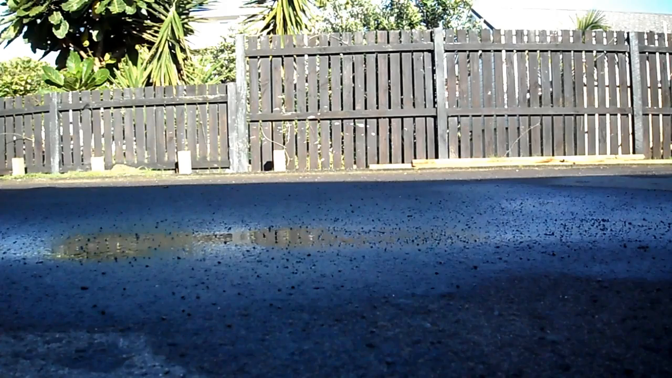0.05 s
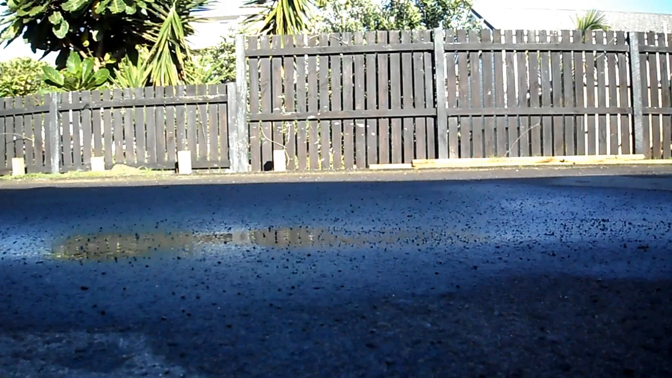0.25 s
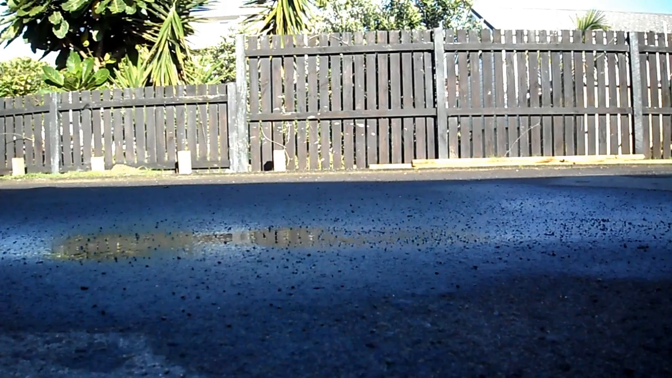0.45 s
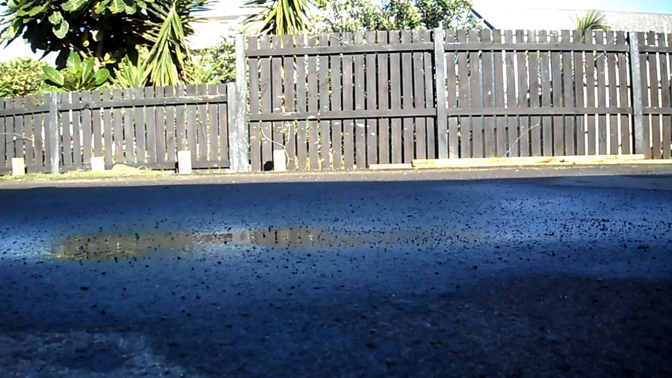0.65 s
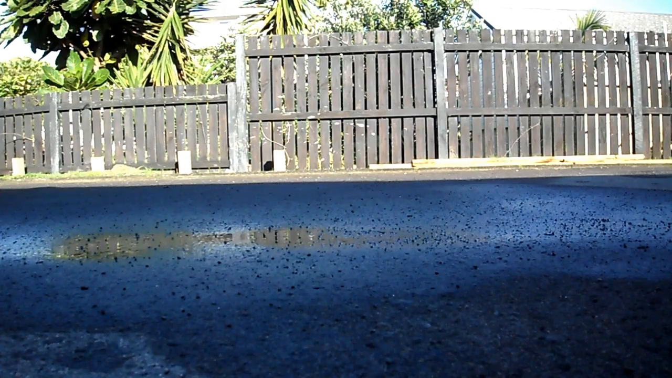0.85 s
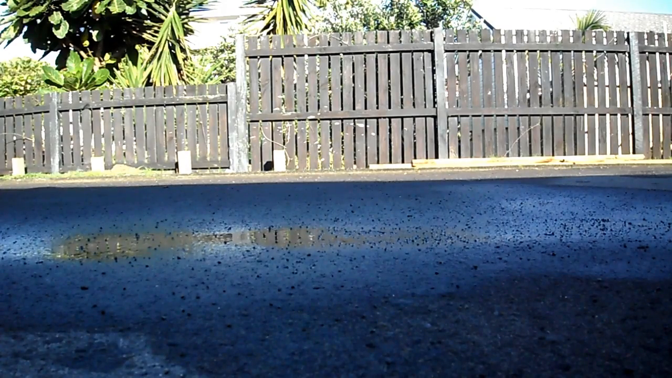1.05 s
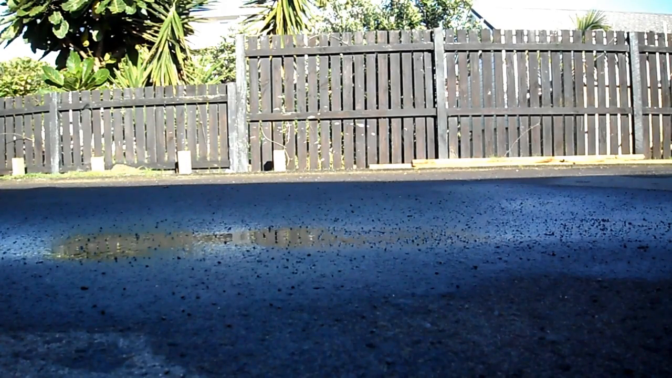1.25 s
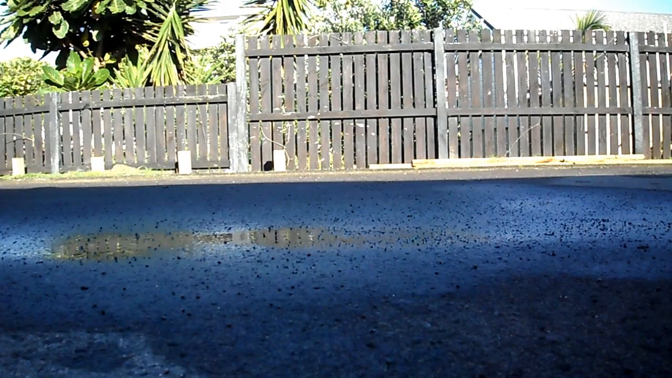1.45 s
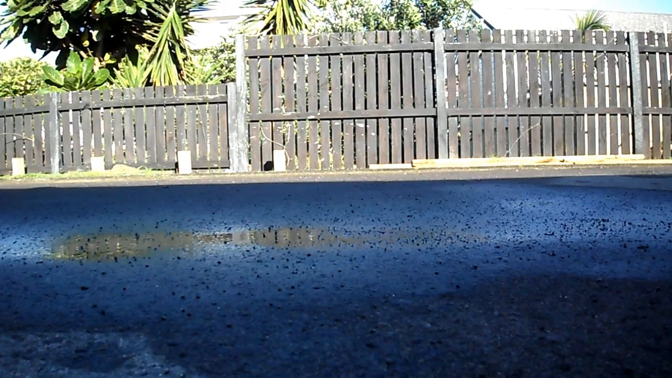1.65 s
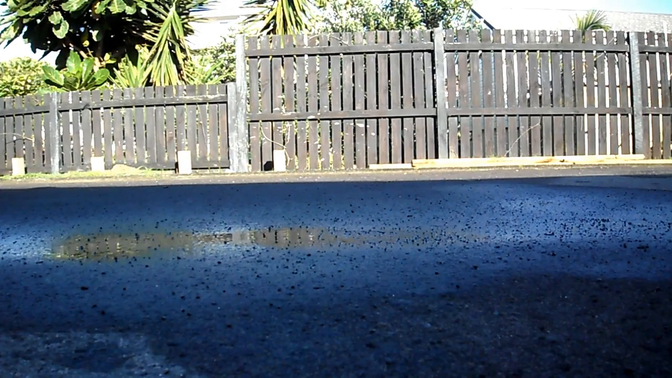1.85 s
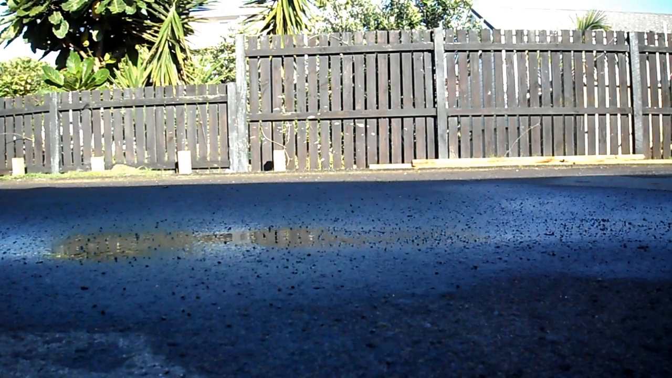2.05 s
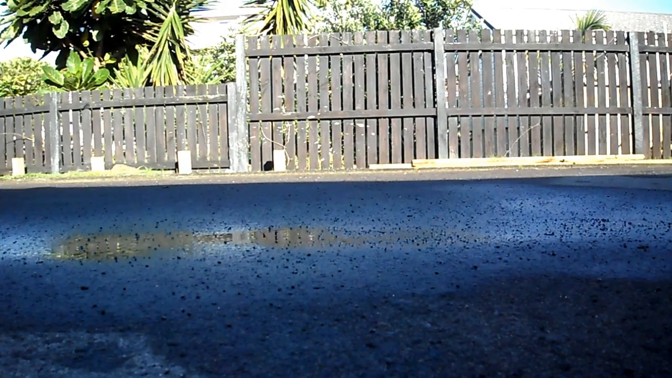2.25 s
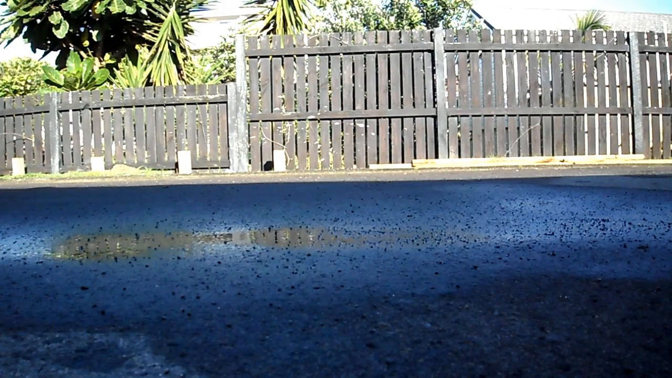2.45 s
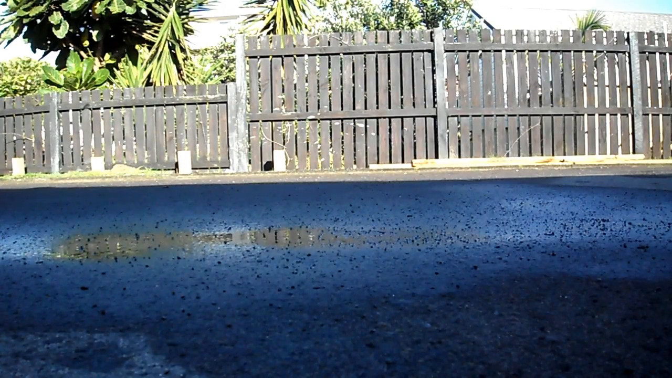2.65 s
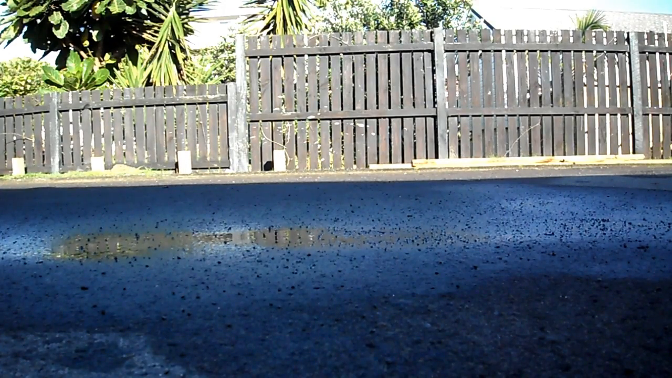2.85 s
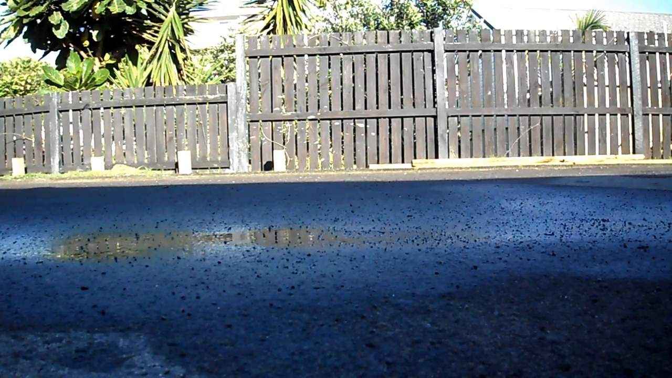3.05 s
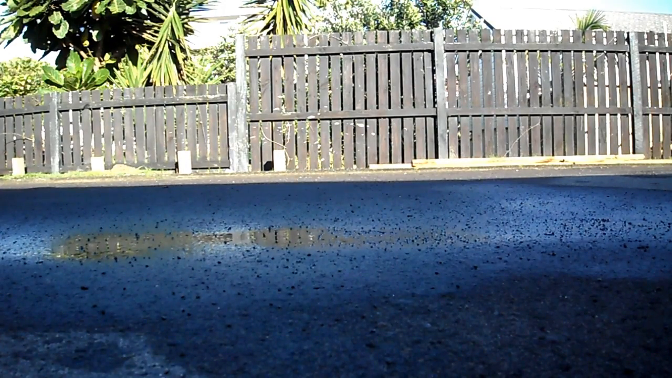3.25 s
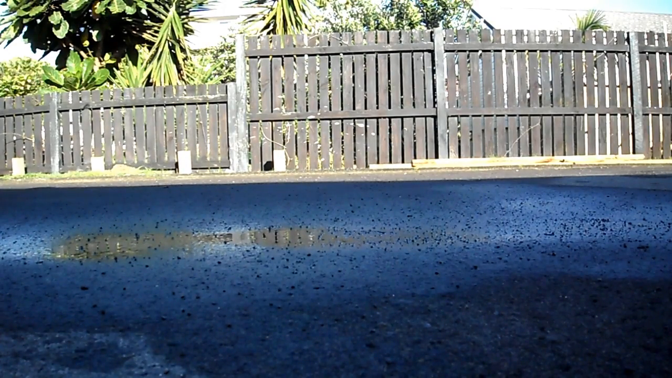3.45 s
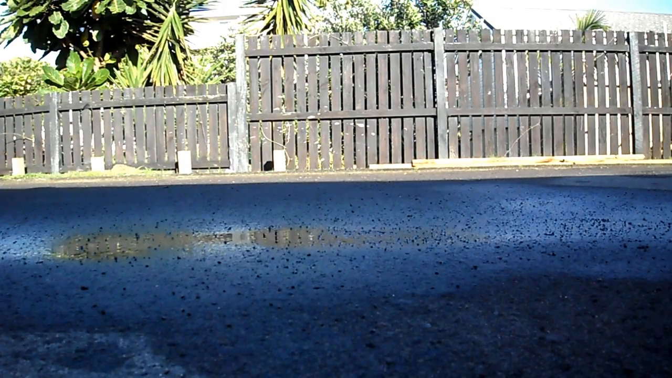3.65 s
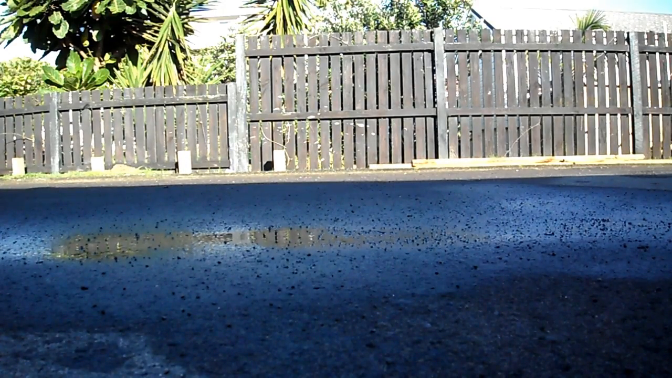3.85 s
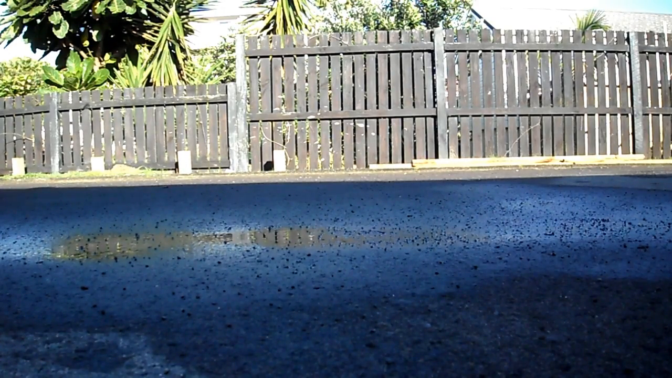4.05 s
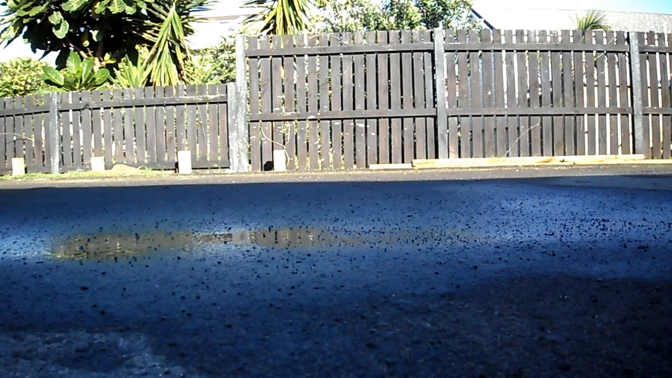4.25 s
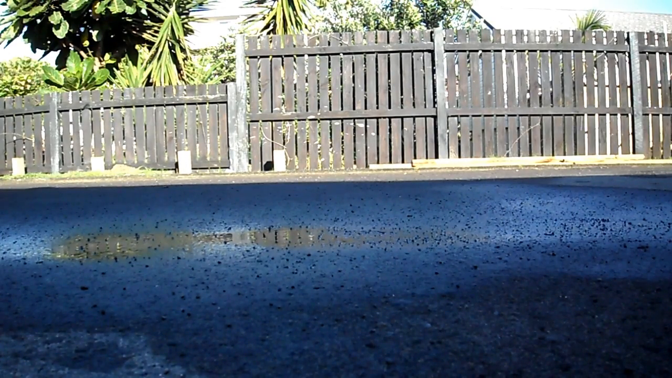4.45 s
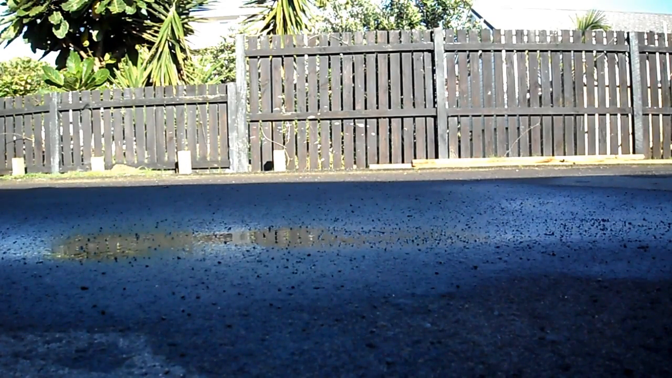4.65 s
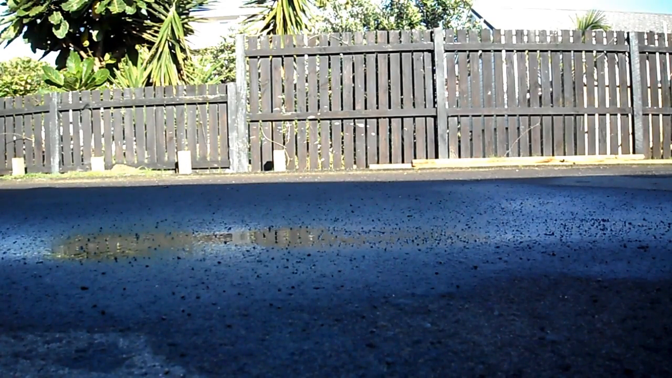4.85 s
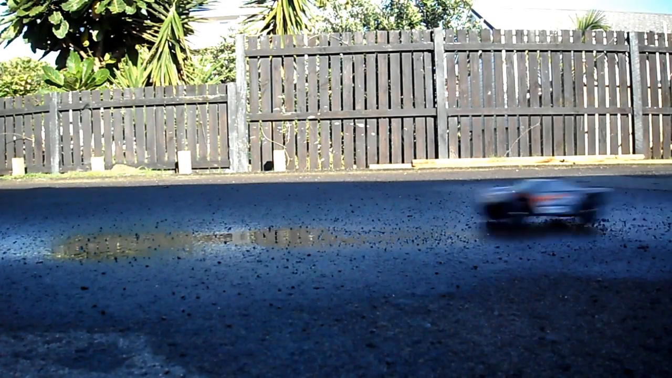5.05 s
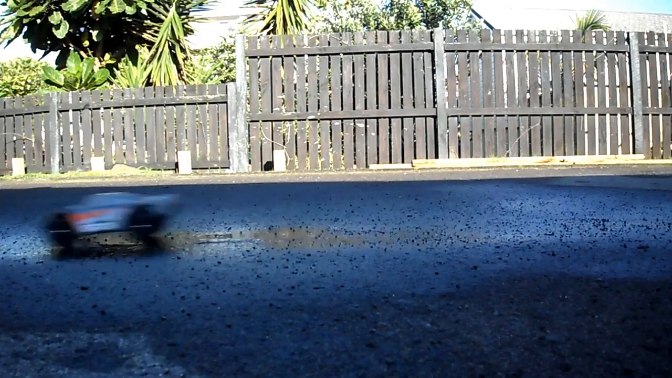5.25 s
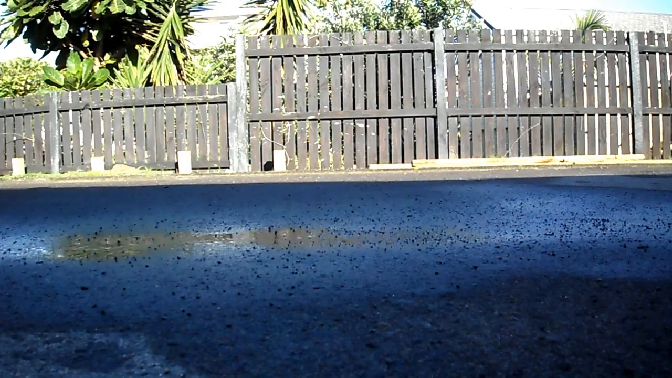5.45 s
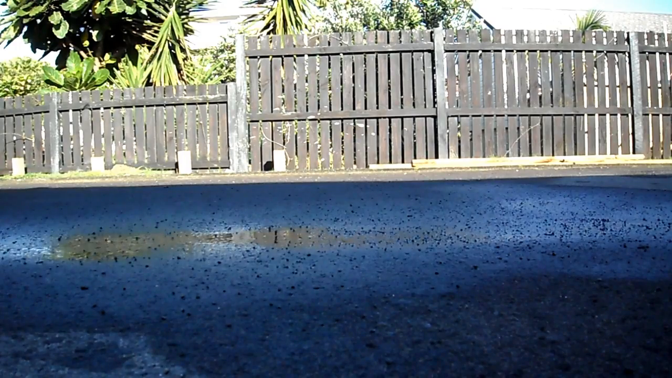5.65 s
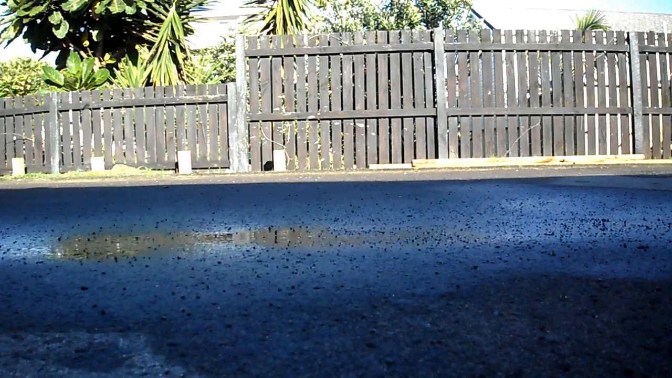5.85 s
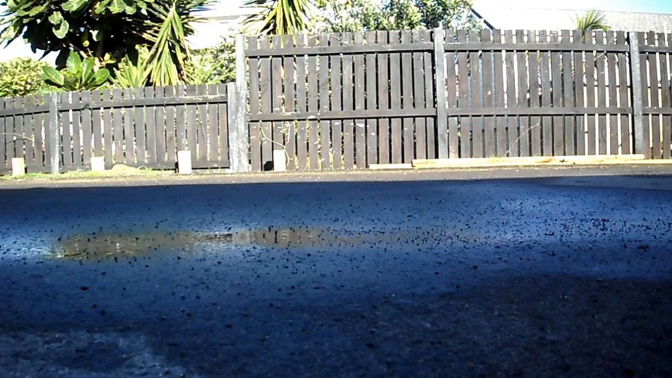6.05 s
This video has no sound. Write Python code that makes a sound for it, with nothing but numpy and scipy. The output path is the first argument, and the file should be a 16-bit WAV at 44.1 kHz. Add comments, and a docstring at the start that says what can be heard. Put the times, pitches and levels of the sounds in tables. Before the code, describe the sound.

A battery toy truck gives a short, distant burst of gear whine on a wet driveway, then coasts almost to silence while a small bird chirps faintly. It speeds up again, its whine rising and growing louder, tyres hissing and spraying through puddles. It passes close to the microphone with short, high tyre squeals and a plastic clatter, brakes, and whines away. A soft outdoor rumble lies underneath.

```python
"""A battery toy truck on a wet driveway: a burst of throttle, a long coast, then a fast run close by.
Its gears whine and tick, its motor sings and its plastic shell rattles. The tyres rumble, hiss,
throw spray and squeal as they slip; the truck jolts, brakes and pulls away.
In the lull a small bird chirps and a far one holds a thin note, over a quiet outdoor bed."""
import sys
import numpy as np
from scipy import signal
from scipy.fft import rfft, irfft, next_fast_len
from scipy.io import wavfile
from scipy.ndimage import uniform_filter1d

SR = 44100
rng = np.random.default_rng(int(sys.argv[2]) if len(sys.argv) > 2 else 0)


def generate_wav(signal):
    """Clip the signal to [-1, 1] and save it as 16-bit WAV at the path in sys.argv[1]."""
    frames = np.transpose(np.atleast_2d(signal))
    scaled = np.clip(frames, -1, 1) * 32767
    pcm = np.round(scaled).astype(np.int16)
    wavfile.write(sys.argv[1], SR, pcm)


N = 269010
TIME = np.arange(N) / SR

# Tone of the outdoor bed, road rumble, tyre hiss, spray and loose chatter.
# Each row: frequency in Hz, relative level in dB.
AIR_EQ = [(15, -29), (25, -8.5), (65, -5), (130, -3.5), (260, -1.5), (550, -5), (900, -11), (1350, -14.5),
          (1900, -22), (4200, -25.5), (5500, -31), (15500, -36)]
ROAD_EQ = [(30, -16), (70, -9), (130, -3.5), (300, -1.5), (600, -1), (1000, -5), (2000, -36), (8000, -62)]
TYRE_EQ = [(300, -19), (1000, -1), (1800, -3.5), (2600, 3.5), (3900, 5), (4800, -0.5), (7000, -3),
           (8000, -7), (10300, -12), (12000, -16.5), (16000, -23)]
SPRAY_EQ = [(200, -7.5), (500, 10), (1100, 18.5), (1900, 9.5), (2800, -1), (5000, 12), (9000, 11),
            (12000, 3.5), (16000, 1)]
RATTLE_EQ = [(100, -25), (300, -28.5), (600, -6), (900, -9), (1300, 9.5), (1850, -7), (2900, -5.5),
             (4500, -26), (8000, -38), (15000, -50)]
# Bird chirps. Each row: start and length in seconds, first and last pitch in Hz, level in dB.
CHIRPS = [(0.671, .019, 2800, 4840, -60.5), (2.283, .016, 2400, 4800, -62), (2.297, .015, 2600, 4730, -68),
          (2.366, .025, 2580, 3310, -61), (2.386, .024, 3100, 3820, -62.5), (2.748, .018, 2680, 5100, -64),
          (2.762, 0.02, 2700, 4970, -67.5), (2.85, 0.035, 3050, 4260, -63)]
# Puddles. Each row: middle and length in seconds, spray level in dB.
PUDDLES = [(0.522, 0.29, -79), (4.136, 0.25, -56.5), (4.684, 0.3, -68), (4.93, 0.14, -52.5),
           (5.278, 0.095, -49)]
# Squeals: a rising run of notes as the gears race while the wheels spin (4.83-5.16 s), then tyre squeaks. Each
# row: middle and length in seconds, pitch in Hz, level in dB.
SQUEALS = [(4.834, 0.024, 3180, -23.5), (4.859, .031, 3130, -24.5), (4.894, 0.033, 3530, -29.5),
           (4.93, 0.058, 3740, -28.5), (4.975, 0.053, 3870, -24.5), (5.014, .035, 3840, -21),
           (5.029, .021, 4030, -27), (5.043, .019, 3880, -18.5), (5.06, .017, 3824, -20),
           (5.076, 0.021, 3895, -17.5), (5.117, 0.039, 4040, -24.5), (5.154, 0.064, 4200, -25),
           (5.406, .018, 3070, -26.5), (5.436, 0.011, 2815, -28), (5.473, 0.016, 3490, -29.5),
           (6.036, 0.013, 3060, -32.5), (6.067, .011, 3180, -26.5), (6.095, 0.017, 3020, -32)]
# Chassis jolts on the wet ground. Each row: start in seconds, strength in dB, length in seconds.
JOLTS = [(5.273, -28.5, 0.018), (5.305, -24, .014), (5.334, -25.5, 0.0094), (5.368, -22.5, .011),
         (5.394, -26.5, 0.018), (5.466, -31.5, 0.0078)]
# Resonances of the shell and the gearbox. Each row: frequency and width in Hz, relative level in dB.
SHELL_MODES = [(1105, 400, -8), (1262, 200, 1), (1424, 124, 2), (1527, 90, -0.5), (2233, 110, -3.5),
               (3030, 460, -11), (3730, 330, -10)]
GEARBOX_MODES = [(2027, 93, 7), (2412, 240, 1.5), (2780, 160, -2), (3296, 184, 3.5), (3902, 90, 5.5),
                 (4260, 98, 0), (4950, 84, -14), (5900, 160, -7.5), (9360, 770, -19.5)]
# How well the shell gives off the whine. Each row: frequency in Hz, gain in dB.
SHELL_EQ = [(900, -7), (1100, -1.5), (1230, 6.5), (1380, 0.5), (1500, 8.5), (1800, -4.5), (2000, 1.5),
            (2250, -1.5), (2700, -5.5), (3300, 1.5), (3900, 10), (4700, -2.5), (7000, 1)]
# Spells of chopped drive current. Each row: start and end in seconds, level of the motor's note in dB.
MOTOR_NOTES = [(0, .58, -68), (2.873, 5.3, -58.5)]
# Play between the teeth frays the whine, most when braking and pulling away.
# Each row: time in seconds, jitter as a share of the pitch.
BACKLASH = [(0, .008), (4.7, .008), (5.2, .016), (5.5, .03), (6.1, .03)]
# Throttle moves: burst, coast, stop, run up, slow at a puddle, cruise, sprint, skid, brake, pull away.
# Each row: start in seconds, target tooth rate in Hz, lag in seconds, chassis load in dB,
# base levels of the mesh tone and of its octave in dB.
THROTTLE = [(0, 3700, 0.78, 2.5, -35, -38), (.56, 2500, 0.06, -4, -37, -46),
            (1.05, 1000, 1.7, -2.5, -54, -60), (2.2, 240, 0.19, -4, -54, -56),
            (2.87, 3720, 0.81, 1, -41, -39), (4.08, 2200, 0.52, -1, -34, -39),
            (4.27, 2500, 0.088, -3, -46, -45), (4.42, 2559, .03, 1, -46, -35.5),
            (4.785, 3350.5, .035, 1.5, -33, -38.5), (5.17, 2501.5, .14, -0.5, -39, -46),
            (5.24, 2200, .012, 1.5, -26.5, -43), (5.285, 2.5, 0.64, 0.5, -59, -54),
            (5.515, 599.5, 0.25, 1.5, -37, -35), (5.8, 3060, 0.13, 0.5, -34, -39)]
# How near the truck sounds. Each row: time in seconds, gain in dB.
NEARNESS = [(0, -30.5), (.3, -25.5), (.55, -26.5), (1.2, -30.5), (2.2, -34), (3.05, -22), (3.5, -15),
            (3.85, -15.5), (4.15, -12.5), (4.46, -12.5), (4.72, -14.5), (4.78, -9), (5.0, -5), (5.3, -1.5),
            (5.6, -3), (5.8, -6), (6.1, -8.5)]


def undb(db):
    """Decibels to gain."""
    return 10 ** (np.asarray(db) / 20)


def curve(table):
    """A line through (seconds, value) points, one value a sample."""
    return np.interp(TIME, *np.transpose(table))


def gate(start, end, edge_s=0.015):
    """1 between two times, with short ramps."""
    return np.clip(np.minimum(TIME - start, end - TIME) / edge_s, 0, 1)


def add(out, start_s, sound):
    """Mix a sound in at its start time."""
    i = int(np.clip(start_s * SR, 0, N - 1))
    out[i:i + len(sound)] += sound[:N - i]


def unit(x):
    """Scale to rms 1."""
    return x / np.sqrt(np.mean(x ** 2))


def band_unit(x, low_hz, high_hz):
    """Scale to rms 1 inside a band."""
    hz = np.arange(N // 2 + 1) * SR / N
    band = rfft(x)[(hz > low_hz) & (hz < high_hz)]
    return x * N / np.sqrt(2 * np.sum(np.abs(band) ** 2))


def sine(hz):
    """A tone of rms 1 that follows a pitch curve."""
    return np.sqrt(2) * np.sin(2 * np.pi * np.cumsum(hz) / SR)


def walk(rate):
    """Smooth random drift of rms 1 that moves about rate times a second."""
    hz = np.arange(int(min(4 * rate, SR / 2) * N / SR)) * SR / N
    phases = np.exp(2j * np.pi * rng.random(N // 2 + 1)[:len(hz)])
    return unit(irfft(phases * np.exp(-(hz / rate) ** 2), next_fast_len(N, True))[:N])


def grains(rate, spread_db):
    """Tiny random impacts, about rate a second, a few much larger than the rest."""
    hits = (rng.random(N) < rate / SR) * rng.standard_normal(N)
    return unit(hits * undb(spread_db * np.minimum(rng.exponential(size=N), 4)))


def eq_db(hz, eq):
    """Gain of an EQ curve at a frequency, in dB."""
    points_hz, db = np.transpose(eq)
    return np.interp(np.log(hz), np.log(points_hz), db)


def shape(x, response):
    """Filter with a response given as a function of frequency."""
    size = next_fast_len(N + SR // 4)
    hz = np.arange(size // 2 + 1) * SR / size + 1
    return irfft(rfft(x, size) * response(hz), size)[:N]


def colour(x, eq):
    """Apply an EQ curve and scale to rms 1."""
    return unit(shape(x, lambda f: undb(eq_db(f, eq))))


def resonate(x, modes):
    """Ring steep-skirted resonances and scale to rms 1."""
    def response(f):
        return sum(undb(db) / (1 + 1j * (f / hz - hz / f) * hz / (1.47 * width)) ** 2
                   for hz, width, db in modes)
    return unit(shape(x, response))


def scatter(x, wet_db, tail_s):
    """Ground, fence and walls return a short, dense trail of echoes."""
    tail = rng.standard_normal(N) * np.exp(-TIME / tail_s)
    echoes = signal.fftconvolve(x, tail / np.linalg.norm(tail))[:N]
    return (x + undb(wet_db) * echoes) / np.hypot(1, undb(wet_db))


def outdoors():
    """A soft, far rumble that breathes a little, with a faint low hum."""
    air = colour(rng.standard_normal(N), AIR_EQ) * undb(-58 + 0.5 * walk(10))
    hum = sine(100 + 2.5 * walk(6)) * undb(-73 + 2.5 * walk(5))
    return air + hum


def birds(held_hz=4180, echo_db=0.5, echo_s=0.025):
    """One far held note, and quick upward chirps that level off, each slapped back by a wall."""
    out = sine(held_hz * (1 + 0.0081 * walk(52.5))) * undb(-80) * gate(2.5, 2.74)
    for start, length, first_hz, last_hz, db in CHIRPS:
        remaining = np.linspace(1, 0, int(length * SR))
        pitch = last_hz - (last_hz - first_hz) * remaining ** 1.74
        chirp = undb(db) * signal.windows.tukey(len(pitch), 0.5) * sine(pitch)
        add(out, start, chirp)
        add(out, start + echo_s, undb(echo_db) * chirp)
    return scatter(out, wet_db=-8, tail_s=0.056)


def rumble(db):
    """Hollow tyres drum over the grain of the asphalt."""
    return colour(grains(rate=2500, spread_db=4), ROAD_EQ) * undb(db)


def spray(db, bumps):
    """Flung droplets patter in flurries on ground and shell; each puddle throws a swell of them."""
    flow = undb(db)
    for middle, length, splash_db in PUDDLES:
        add(flow, middle - length / 2, undb(splash_db) * np.hanning(int(length * SR)))
    drops = grains(rate=11000, spread_db=4.5) * undb(0.66 * bumps + 1.6 * walk(120))
    return band_unit(colour(drops, SPRAY_EQ), 11000, 15500) * flow


def tyre_hiss(db, bumps):
    """Tread peels off wet asphalt in a fine crackle, with faint pitches wandering through it."""
    peel = grains(rate=12000, spread_db=2) * undb(1.5 * bumps)
    pitches = sum(sine(hz * (1 + 0.05 * walk(12))) * undb(8.3 * walk(40))
                  for hz in np.geomspace(2400, 11000, 18))
    hiss = colour(peel + undb(-13) * unit(pitches), TYRE_EQ)
    return band_unit(hiss, 4500, 8000) * undb(db)


def squeal(arch_hz=120, sag_hz=150, octave_db=-21):
    """Short notes near 3-4 kHz that arch and sag: first a rising run as the gears race while the wheels spin,
    later the squeaks of wet rubber that sticks and slips."""
    out = np.zeros(N)
    waver = 1 + 0.012 * walk(210)
    for middle, length, hz, db in SQUEALS:
        start = middle - length / 2
        position = np.linspace(-1, 1, int(length * SR))
        pitch = hz - sag_hz * position / 2 + arch_hz * (1 / 4 - position ** 2)
        pitch *= np.roll(waver, -int(start * SR))[:len(pitch)]
        note = sine(pitch) + undb(octave_db) * sine(2 * pitch)
        add(out, start, undb(db) * np.cos(np.pi * position / 2) * note)
    return out


def jolts():
    """Each jolt is a short clatter of shell with a splash."""
    force = np.zeros(N)
    for start, db, length in JOLTS:
        add(force, start, undb(db) * signal.windows.tukey(int(length * SR), 0.6))
    clatter = resonate(grains(rate=4000, spread_db=1.5), SHELL_MODES)
    splash = colour(grains(rate=8000, spread_db=1.5), SPRAY_EQ)
    return force * (undb(-5) * clatter + undb(-4.5) * splash)


def rattle(db, bumps):
    """The chassis chatters against the shell, harder on every bump."""
    ticks = grains(rate=5000, spread_db=2.5) * undb(0.6 * bumps)
    shell = resonate(ticks, SHELL_MODES)
    chatter = colour(grains(rate=9000, spread_db=1.5), RATTLE_EQ)
    return band_unit(shell + undb(-2) * chatter, 1100, 1800) * undb(db)


def motor(chopper_hz=1398, flutter_db=4.5):
    """The speed controller's chopped current makes the motor sing one fluttering note."""
    power = sum(undb(db) * gate(start, end) for start, end, db in MOTOR_NOTES)
    note = sine(chopper_hz * (1 + 0.00398 * walk(41.6)))
    return power * note * undb(flutter_db * walk(66))


def gearbox(tick_db, ring_db):
    """Loose teeth tick in the gearbox; metal rings thinly above."""
    ticks = resonate(grains(rate=3500, spread_db=4), GEARBOX_MODES)
    ring = resonate(rng.standard_normal(N), [(6900, 116, 0)])
    return ticks * undb(tick_db) + ring * undb(ring_db)


def throttle(start_hz=766.0, take_up_s=0.021):
    """The tooth rate eases toward each target; its slope, the load and whine levels are smoothed."""
    tooth_hz = np.full(N, start_hz)
    controls = np.zeros((4, N))
    for start, target_hz, lag_s, *levels_db in THROTTLE:
        i = int(start * SR)
        gap_hz = (target_hz - tooth_hz[i]) * np.exp(-TIME[:N - i] / lag_s)
        tooth_hz[i:] = target_hz - gap_hz
        controls[0, i:] = gap_hz / lag_s
        controls[1:, i:] = np.array(levels_db)[:, None]
    size = int(take_up_s * SR)
    return tooth_hz, *uniform_filter1d(controls, size, origin=(size - 1) // 2)


def gear_whine(tooth_hz, mesh_db, octave_db, teeth=17, rough_db=4):
    """Meshing teeth sing through the shell; load wobbles their rate, each motor turn their force."""
    mesh_db = mesh_db + eq_db(tooth_hz, SHELL_EQ)
    octave_db = octave_db + eq_db(2 * tooth_hz, SHELL_EQ)
    hz = tooth_hz * (1 + 0.00608 * walk(69.7) + curve(BACKLASH) * walk(360))
    shaft_swing = 1 + 0.19 * sine(hz / teeth)
    weaker_db = np.minimum(mesh_db, octave_db)
    fifth_db = weaker_db - 3 + 50 * np.log10(np.minimum(hz / 2700, 1))  # comes in at high speed
    partials = (1, mesh_db), (1.5, fifth_db), (2, octave_db), (3, weaker_db - 13)
    tones = sum(sine(ratio * hz) * undb(db + rough_db * (walk(80) - 0.95)) for ratio, db in partials)
    return scatter(shaft_swing * tones, wet_db=-5.5, tail_s=0.019)


def scene(cruise_hz=2810, creep_hz=794, rolling_hz=1013):
    """Speed, load and nearness ride the truck's running layers, over the birds and the outdoor bed."""
    tooth_hz, hz_per_s, load_db, mesh_db, octave_db = throttle()
    octaves = np.log2(np.maximum(tooth_hz, 1) / cruise_hz)  # its factors below: dB per doubling of speed
    creep_db = np.interp(tooth_hz, [creep_hz, rolling_hz], [-11, 0])  # the truck falls quiet at a crawl
    truck_db = curve(NEARNESS) + creep_db
    strain_db = 6.5 * np.minimum(np.abs(hz_per_s) / 16000, 1)  # the whine swells as the speed changes
    skid_db = 3.5 * np.clip(-hz_per_s / 4200, 0, 1)  # the tyres scrub louder as the truck slows
    bumps = walk(67)  # uneven ground shakes hiss, spray and rattle together
    whine_db = truck_db + strain_db
    drive = gear_whine(tooth_hz, whine_db + mesh_db, whine_db + octave_db + 3 * octaves) + motor()
    ring_db = 1.71 * truck_db + load_db - 42  # the ring fades faster with distance
    drive += gearbox(truck_db - 36 + 4 * octaves, ring_db)
    wheels = (tyre_hiss(truck_db + load_db + skid_db - 37 + 10 * octaves, bumps)
              + spray(truck_db + skid_db - 53 + 14 * octaves, bumps)
              + rumble(0.47 * truck_db - 48.5 + 2 * octaves)  # the rumble carries farther
              + squeal())
    chassis = rattle(truck_db + load_db - 34 + 3 * octaves, bumps) + jolts()
    return (drive + wheels + chassis + birds() + outdoors())[None]


def record(dry, top_hz=15650):
    """A steep low-pass trims the very top."""
    return signal.sosfilt(signal.ellip(10, 0.2, 70, top_hz, fs=SR, output="sos"), dry)


dry = scene()
out = record(dry)
generate_wav(out)
```